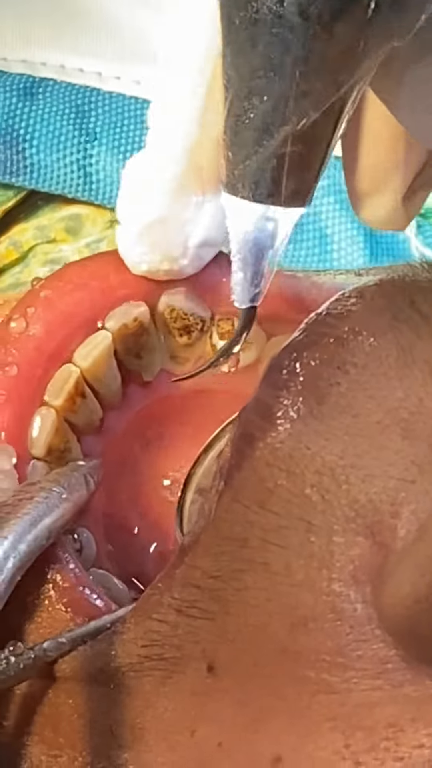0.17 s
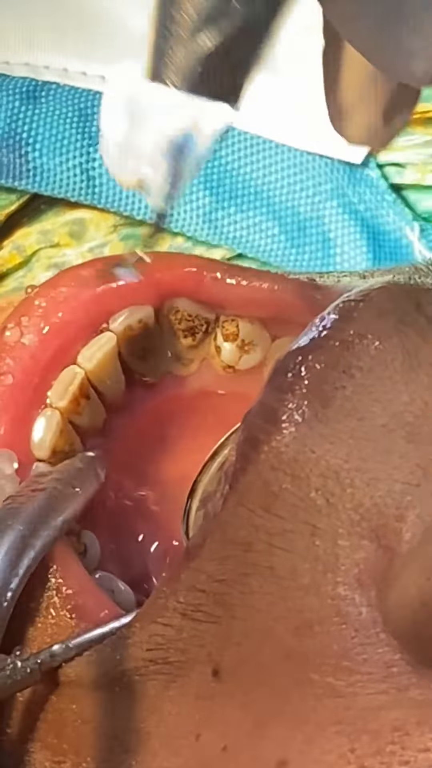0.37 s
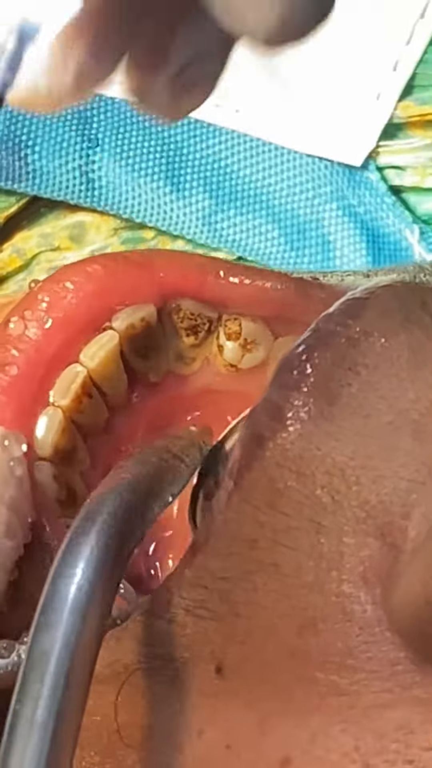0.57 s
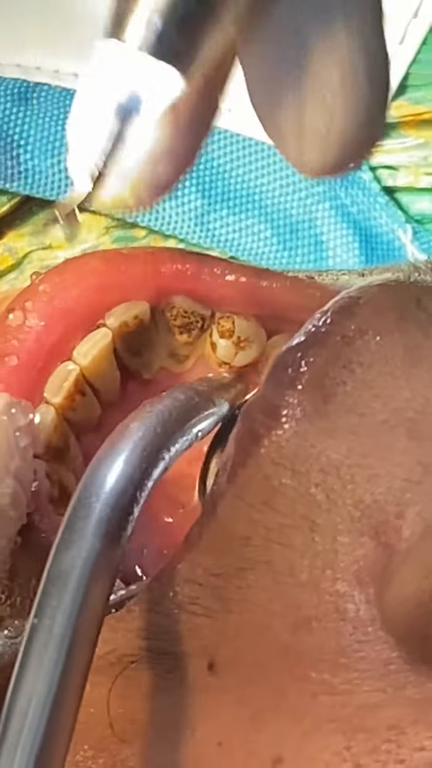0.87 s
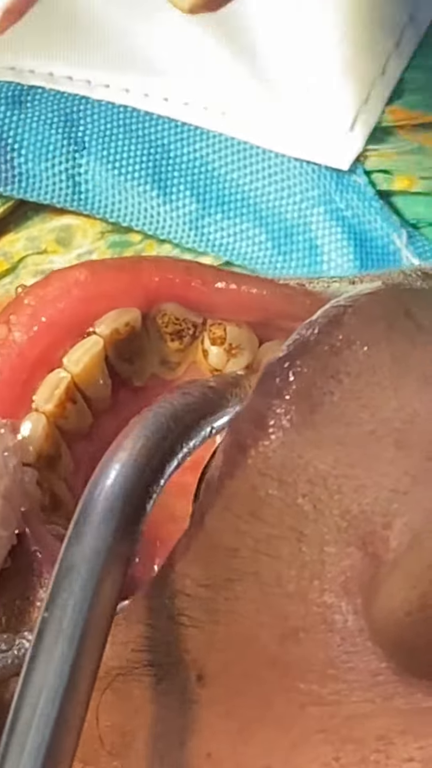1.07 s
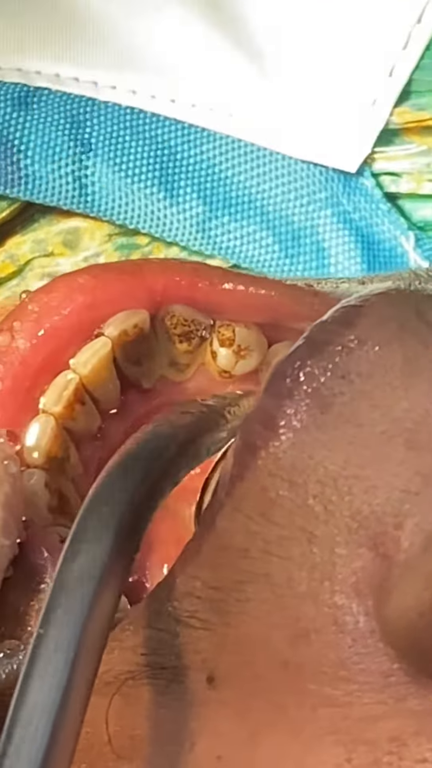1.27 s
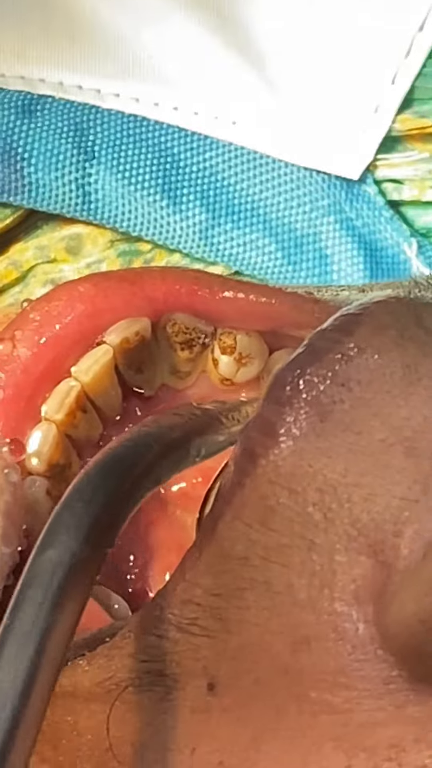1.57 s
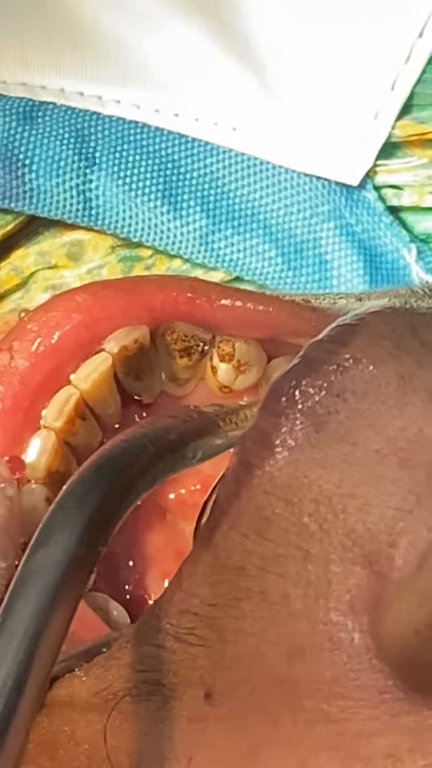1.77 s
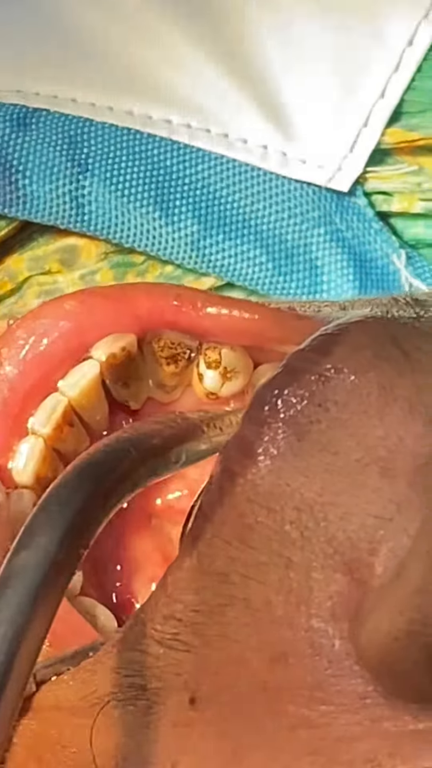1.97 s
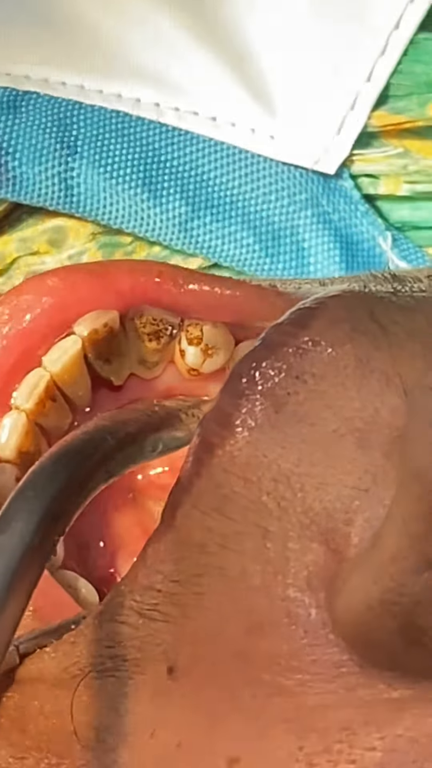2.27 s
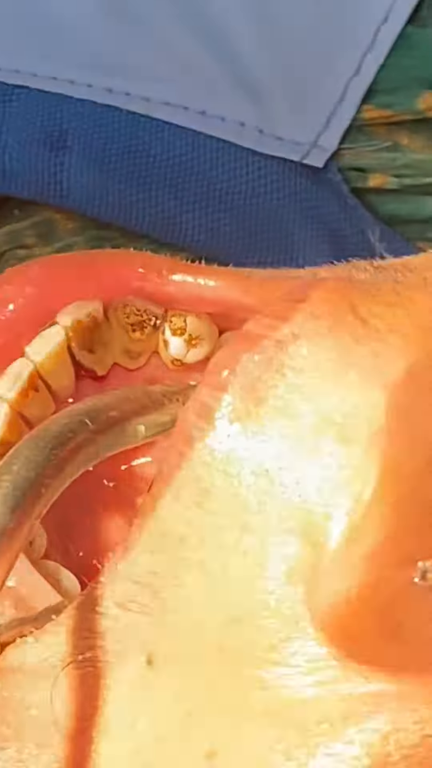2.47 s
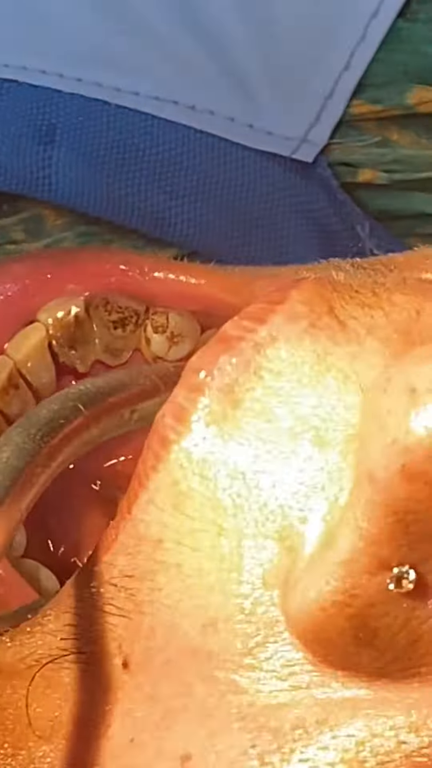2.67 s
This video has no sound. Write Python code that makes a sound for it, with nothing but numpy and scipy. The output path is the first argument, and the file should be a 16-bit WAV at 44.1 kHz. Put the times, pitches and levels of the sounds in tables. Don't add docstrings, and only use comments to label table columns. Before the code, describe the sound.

A dental suction tube hisses close by, first spitting and gurgling wetly, then drawing steady, drier air

```python
import sys
import numpy as np
from scipy import signal
from scipy.fft import rfft, irfft, next_fast_len
from scipy.io import wavfile
from scipy.ndimage import uniform_filter1d, map_coordinates

SR = 44100
rng = np.random.default_rng(int(sys.argv[2]) if len(sys.argv) > 2 else 0)


def master_out(mix):
    frames = np.transpose(np.atleast_2d(mix))
    ceiling = np.clip(frames, -1, 1)
    pcm = np.round(ceiling * 32767).astype(np.int16)
    wavfile.write(sys.argv[1], SR, pcm)


def invert_db(level):
    return 10 ** (np.asarray(level, dtype=float) / 20)


N = 124803


def unit(x):
    return x / np.sqrt(np.mean(x ** 2) + 1e-20)


def along(points, hz):
    f, v = np.transpose(points)
    return np.interp(np.log(hz + 1), np.log(f + 1), v)


def curves(rows):
    s, *columns = np.transpose(rows)
    return [np.interp(np.arange(N) / SR, s, column) for column in columns]


def wobble(rate_hz):
    knots = rng.standard_normal(2000)
    return map_coordinates(knots, [np.arange(N) * rate_hz / SR], mode="mirror")


def filtered(x, response):
    m = 2 * next_fast_len(N // 2 + SR // 8)
    return irfft(rfft(x, m) * response(np.fft.rfftfreq(m, 1 / SR)), m)[..., :N]


def ring(f, hz, width_hz):
    return 1j * f * width_hz / (hz * hz - f * f + 1j * f * width_hz)


def causal(gain):
    cepstrum = irfft(np.log(gain + 1e-6))
    half = len(cepstrum) // 2
    cepstrum[1:half] *= 2
    cepstrum[half + 1:] = 0
    return np.exp(rfft(cepstrum))


def patchy(depth_db, shape=None):
    f, t, z = signal.stft(rng.standard_normal((3, N)), SR, nperseg=256)
    field = uniform_filter1d(rng.standard_normal(z.shape[1:]), size=5, axis=0)
    field = uniform_filter1d(field, size=16, axis=1)
    z = z * invert_db(depth_db * unit(field))
    if shape is not None:
        z = z * shape(f[:, None], t)
    return signal.istft(z, nperseg=256)[1][:, :N]


def room():
    # hz, level_db
    spectrum = [(20, -41), (45, -9.5), (90, -10), (130, -1.5), (250, -8.5), (450, -14), (1000, -18),
                (2600, -34.5), (4000, -46)]
    # hz, likeness (0-1)
    likeness = [(100, 0.99), (200, 0.99), (350, 0.96), (500, 0.74), (800, 0.53), (1200, 0.6), (1900, 1)]

    def mid_side_response(f):
        angle = np.arccos(np.clip(along(likeness, f), -1, 1)) / 2
        return invert_db(along(spectrum, f)) * np.array([np.cos(angle), np.sin(angle)])

    mid, side = filtered(patchy(1.65)[:2], mid_side_response)
    return invert_db(-36) * unit(np.array([mid + side, mid - side]))


def engine():
    # start_s, second_order_hz, level_db
    speed = [(0.0, 75.8, -41), (0.11, 72.6, -42), (0.26, 75.3, -40), (0.98, 68.1, -37.5), (1.25, 67.7, -36),
             (1.47, 73.0, -33.5), (1.7, 73.5, -39.5), (1.81, 66.6, -44), (1.95, 74.3, -39.5),
             (2.21, 70.6, -40), (2.26, 71.2, -27.5), (2.38, 66.8, -32.5), (2.69, 66.6, -31.5),
             (2.83, 72.2, -35)]
    # order, level_db
    orders = [(1, -39), (2, 1.5), (3, -9.5), (4, -4.5), (5, -8.5), (6, -15.5), (7, -14.5)]
    second_hz, level_db = curves(speed)
    turn = np.pi * np.cumsum(second_hz * (1 + 0.0083 * wobble(12))) / SR
    lines = sum(invert_db(db + (1.64 + 0.36 * k) * wobble(10)) * np.cos(k * turn) for k, db in orders)
    return invert_db(level_db + 1.5) * lines


def hum():
    # order, rms_db
    orders = [(6, -40), (8, -45.5), (9, -54.5), (12, -54), (13, -51.5), (15, -51), (17, -48), (18, -48.5),
              (19, -55), (20, -55), (21, -53), (22, -49), (30, -58), (33, -62)]
    shaft_hz, mains_hz, mains_db = 24.6, 99.6, -36.5
    turn = 2 * np.pi * np.cumsum(shaft_hz * (1 + 0.001553 * wobble(2.06))) / SR
    compressor = sum(invert_db(db + 3 + 2.0 * wobble(11)) * np.sin(k * turn + 7 * rng.random())
                     for k, db in orders)
    mains = np.sin(2 * np.pi * mains_hz * np.arange(N) / SR)
    return compressor + invert_db(mains_db + 2.5 + 1.5 * wobble(5.54)) * mains


def cavity():
    # start_s, level_db, centre_hz
    resonance = [(0.0, -29, 1330), (0.09, -32.5, 1400), (0.54, -30.5, 1400), (0.72, -32.5, 1390),
                 (0.77, -27, 1360), (0.89, -32, 1410), (0.94, -26, 1410), (0.97, -32, 1480),
                 (1.03, -27.5, 1460), (1.07, -36.5, 1450), (1.15, -30, 1404), (1.32, -38, 1460),
                 (1.35, -34, 1430), (1.37, -36.5, 1530), (1.58, -34, 1444), (2.7, -27.5, 1376),
                 (2.72, -45.5, 1330), (2.83, -32, 1300)]
    s, _, centre_hz = np.transpose(resonance)
    width_hz, flutter_db = 420, 0.5
    air = patchy(1.17, lambda f, t: np.abs(ring(f, np.interp(t, s, centre_hz), width_hz)) ** 3)
    level_db = curves(resonance)[0] - 0.4
    return unit(air) * invert_db(level_db + flutter_db * wobble(44.94) + 0.63 * wobble(8.72))


def wetness():
    # start_s, wetness (0-1)
    wet_points = [(0, 0.86), (.44, 0.85), (.47, 0.6), (.53, 1), (.62, 0.86), (.75, 0.56), (.9, 0.5),
                  (1.3, 0.34), (2.5, 0.08), (2.83, 0.4)]
    return curves(wet_points)[0]


def surge_lift_db():
    # start_s, lift_db, rise_s, hold_s, fall_s
    surges = [
        (0.451, 9, 0.0055, 0.085, 0.024),
        (0.69, 7, 0.0021, 0.03, 0.1),
        (1.211, 4, 0.023, 0.041, 0.044),
        (2.301, 7, 0.036, 0.03, 0.026),
        (2.486, 3, 0.017, 0.018, .02),
        (2.702, -15, 0.0055, 0.04, 0.004),
        (2.7, -9.5, .005, 0.079, .006),
    ]
    now = np.arange(N) / SR
    return sum(np.interp(now, s + np.cumsum([0, rise, hold, fall]), [0, db, db, 0])
               for s, db, rise, hold, fall in surges)


def bubbles(wet):
    per_s, peak_db, t60_s = 95, 6, 0.0076
    t = np.arange(SR // 40) / SR
    gap, strength = rng.random((2, 400))
    at = (np.cumsum(0.41 + 1.1 * gap) * SR / per_s).astype(int)
    pops = np.bincount(at, invert_db(peak_db - 10 * strength), N)[:N]
    return wet * signal.fftconvolve(pops, invert_db(-60 * t / t60_s))[:N]


def spits(wet):
    # start_s, peak_db
    drops = [(0.0173, -21), (0.0248, -25), (0.048, -23), (0.0627, -22), (0.0727, -23), (0.127, -22),
             (0.1365, -22), (0.146, -26), (0.1817, -26), (0.1925, -27), (0.2105, -23), (0.2212, -24),
             (0.2526, -21), (0.2575, -19.5), (0.2627, -27), (0.2714, -18), (0.2792, -23), (0.291, -19),
             (0.3087, -18), (0.3177, -19), (0.3316, -27), (0.3622, -23), (0.389, -16.5), (0.411, -20),
             (0.4199, -23), (0.4516, -21), (0.456, -21.5), (0.46, -16), (0.4721, -19), (0.4768, -18),
             (0.51, -21), (0.5132, -25), (0.5205, -23), (0.5441, -20), (0.5532, -19), (0.562, -20),
             (0.567, -19.5), (0.5801, -15), (0.5976, -23), (0.601, -25), (0.6203, -27), (0.6287, -28),
             (0.6646, -25), (0.6742, -24), (0.6875, -20), (0.69, -18.5), (0.6948, -23), (0.7082, -18),
             (0.7433, -30), (0.7483, -27), (1.058, -16), (1.189, -15), (1.941, -25), (2.0146, -21),
             (2.0772, -23), (2.225, -21), (2.239, -24.5), (2.2553, -21), (2.518, -20.5)]
    gain_db, drop_t60_s, spray_t60_s, spray_db = 7, 0.0045, 0.02, -10
    t = np.arange(SR // 40) / SR
    burst = invert_db(-60 * t / drop_t60_s) + invert_db(spray_db - 60 * t / spray_t60_s)
    out = np.zeros((3, N))
    for s, db in drops:
        start = round(s * SR)
        noise = rng.standard_normal((3, len(t)))
        out[:, start:start + len(t)] += invert_db(db + gain_db) * wet[start] * burst * noise
    return out


def mode_power(f, modes):
    return sum((invert_db(db) * np.abs(ring(f, hz, width)) ** 1.41) ** 2 for hz, width, db in modes)


def upper_tube(high):
    # centre_hz, width_hz, level_db
    front_teeth = [(4830, 250, 2), (5900, 800, -6), (13460, 370, 0), (15500, 600, -6), (7750, 600, -1),
                   (8300, 400, -5), (9400, 900, -5), (10600, 600, 0), (11200, 700, -1), (12200, 900, -6)]
    lifted_tip = [(4830, 250, 0), (6100, 900, -5), (13000, 900, -1), (14100, 700, -5), (15400, 700, -6),
                  (7600, 700, -2), (8300, 500, -5), (9500, 900, 0), (10400, 600, -3), (11900, 900, -2)]
    deep_cheek = [(4830, 300, 1), (5880, 1000, -5), (6600, 600, -4), (13400, 400, 0.5), (14280, 450, -3),
                  (15500, 450, -11), (7400, 800, -1), (9450, 650, 3), (10100, 400, -4), (11870, 500, 0)]
    back_teeth = [(4800, 700, -4), (5800, 1000, -3), (6900, 900, -2), (13400, 600, -4), (14100, 600, -2),
                  (15500, 450, -8), (8500, 500, -9), (9250, 500, 0), (10500, 900, -4), (11950, 550, 0)]
    near_throat = [(4800, 300, -4), (5500, 700, -2), (6300, 700, 0), (13200, 500, -9), (13900, 600, -5),
                   (15300, 500, -10), (7750, 350, -3), (9400, 550, 1), (11900, 500, -1)]
    # start_s, place (0-4, in the order above)
    path = [
        (0, 0),
        (.43, 0),
        (.46, 1),
        (.74, 1),
        (.86, 2),
        (1.85, 2),
        (2.0, 3),
        (2.5, 3),
        (2.56, 4),
    ]
    place, = curves(path)

    def response(modes):
        def shaped(f):
            floor = invert_db(-24.5) ** 2 * f ** 4 / (f ** 4 + 3000 ** 4)
            return causal(np.sqrt(mode_power(f, modes) + floor))
        return shaped

    out = 0
    for k, modes in enumerate((front_teeth, lifted_tip, deep_cheek, back_teeth, near_throat)):
        share = np.sqrt(np.clip(1 - np.abs(place - k), 0, 1))
        out = out + filtered(high * share, response(modes))
    return out


def lower_tube(low):
    # centre_hz, width_hz, level_db
    low_modes = [(2723, 240, -10.5), (3412, 423, 1), (3980, 270, -9.5)]
    return filtered(low, lambda f: causal(np.sqrt(mode_power(f, low_modes))))


def jet():
    # start_s, jet_level_db, low_modes_level_db
    flow = [(0, -30.5, -36), (.22, -31, -38), (.28, -30, -38.5), (.41, -28, -39), (.45, -37, -38.5),
            (.64, -35, -38.5), (.8, -39.5, -39), (.87, -28, -36), (1.18, -28, -37), (1.4, -28, -37),
            (1.64, -25, -36.5), (1.75, -31, -38), (2.0, -30.5, -38.5), (2.2, -24.5, -38),
            (2.29, -29.5, -42.5), (2.44, -31, -38), (2.7, -37.5, -43.5), (2.83, -42, -47)]
    level_db, low_db = curves(flow)
    wet, lift_db = wetness(), surge_lift_db()
    pops = bubbles(wet)
    sputter_db = 2.5 * np.sqrt(wet) * wobble(170)
    air = unit(patchy(1.39)) * invert_db(sputter_db + 0.48 * wobble(25.16))
    high = air * (1 - 0.37 * wet + pops) * invert_db(level_db + lift_db + 5.5)
    low = air * (1 + 0.24 * pops) * invert_db(low_db + 0.46 * lift_db + 16)
    return upper_tube(high + spits(wet)) + lower_tube(low)


def ports(x):
    # hz, lead_rad
    front_lead = [(1000, 1), (1500, 0), (2300, 0.5), (3200, 0.8), (4000, 0), (4850, 2), (5700, 1.8),
                  (6700, 2), (8300, 3.1), (10900, 3.16), (12800, 4), (13300, 4.5), (15500, 3.5)]
    deep_lead = [(1000, 1), (1500, 0), (2300, -1.5), (3200, 0.76), (4000, -2), (4850, 2.3), (5600, 1.5),
                 (6700, 2), (8200, 3.1), (11200, 3.16), (12000, 4), (15500, 5)]
    # hz, level_db
    front_scatter = [(1200, -20), (2000, -45), (3000, -10), (6200, -7), (6900, -24), (7600, -8),
                     (8400, -35), (10800, -39), (11500, -21), (12700, -24), (13300, -17), (15500, -12)]
    deep_scatter = [(1200, -16), (2000, -44), (3000, -8.5), (7600, -6), (8300, -14), (11200, -42),
                    (11900, -29), (15500, -18)]
    # hz, difference_db
    tilt = [(600, 20), (800, 8), (1170, -8.5), (1500, -0.5), (1900, 0.5)]
    # start_s, length_s
    wide_moments = [
        (.232, .03),
        (.372, .028),
        (.45, .012),
        (.58, .004),
        (.65, .03),
        (2.69, .025),
    ]
    wide_db, wide_hz = -12, 6540
    move_s, move_length_s = 0.43, 0.087
    side, now = np.array([[1], [-1]]), np.arange(N) / SR
    deep = np.clip((now - move_s) / move_length_s, 0, 1)
    out = 0
    for share, lead, scatter in ((1 - deep, front_lead, front_scatter), (deep, deep_lead, deep_scatter)):
        shared = filtered(x[0], lambda f: np.exp(0.5j * side * along(lead, f))
                          * invert_db(side * along(tilt, f) / 2))
        unlike = filtered(x[1:], lambda f: invert_db(along(scatter, f)))
        out = out + share * (shared + unlike)
    wide = sum(np.interp(now, s + np.cumsum([-0.006, 0.006, length, 0.006]), [0, 1, 1, 0])
                 for s, length in wide_moments)
    return out + wide * filtered(x[1:], lambda f: invert_db(wide_db) * (f > wide_hz))


def scene():
    return room() + engine() + hum() + ports(cavity() + jet())


def roll_off(x):
    return signal.sosfilt(signal.butter(12, 15870, fs=SR, output="sos"), x)


def record(dry):
    mix = filtered(dry, lambda hz: hz < 15800)
    return roll_off(mix)


dry = scene()
out = record(dry)
master_out(out)
```